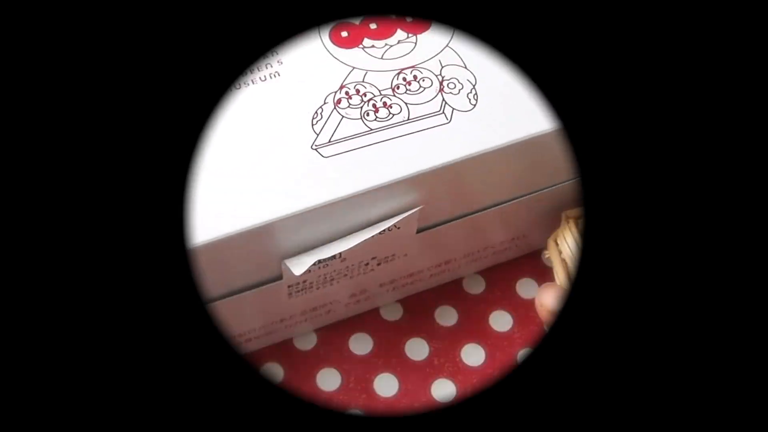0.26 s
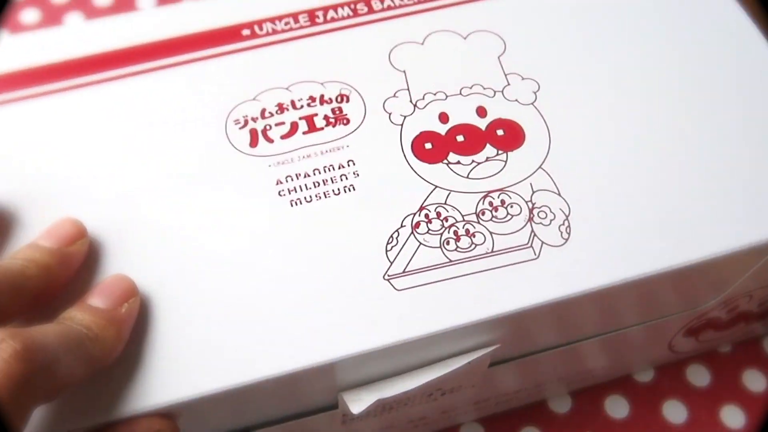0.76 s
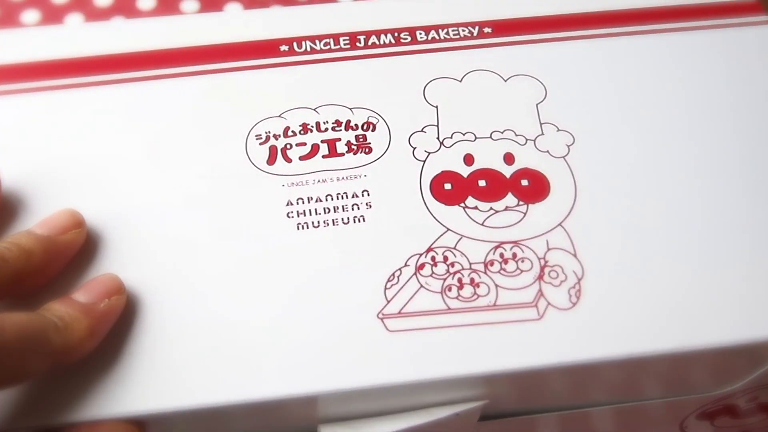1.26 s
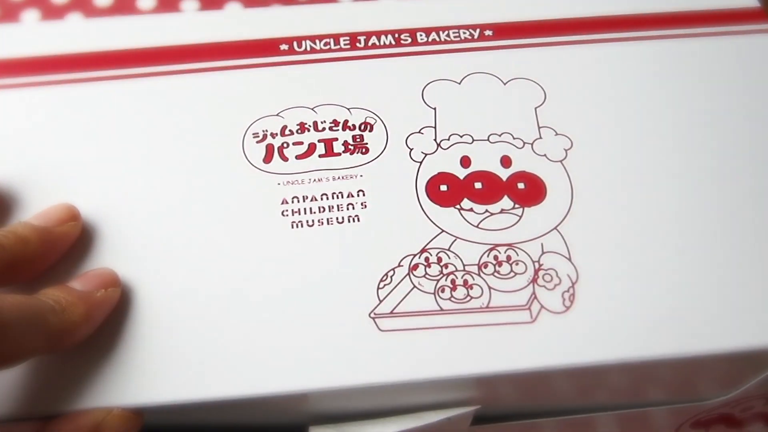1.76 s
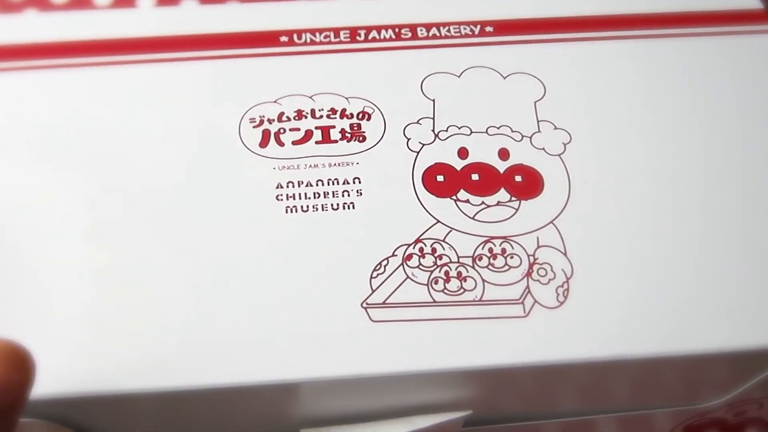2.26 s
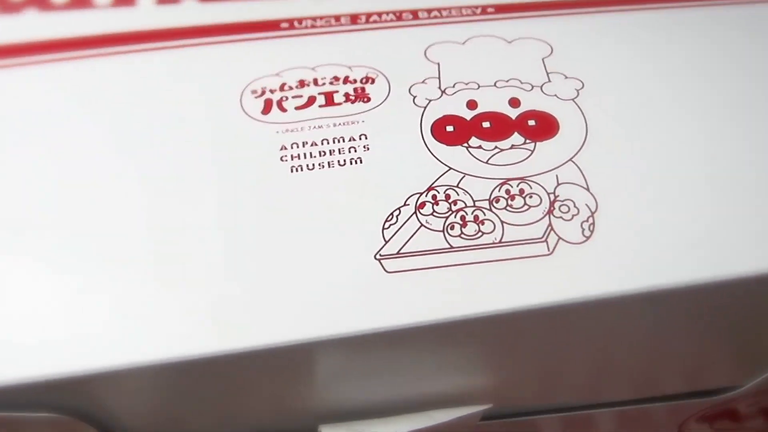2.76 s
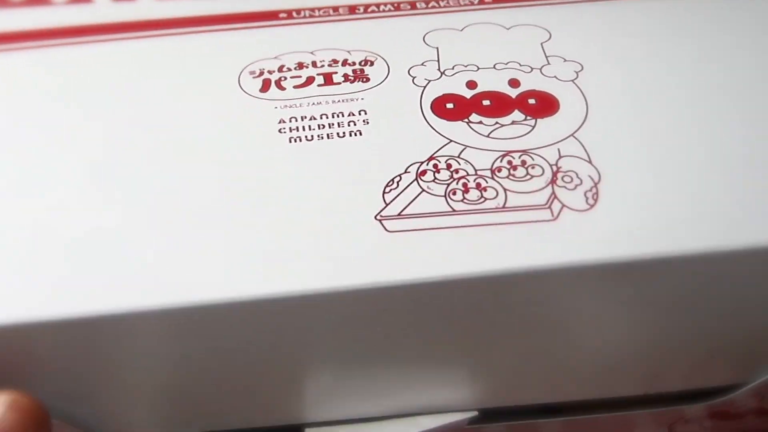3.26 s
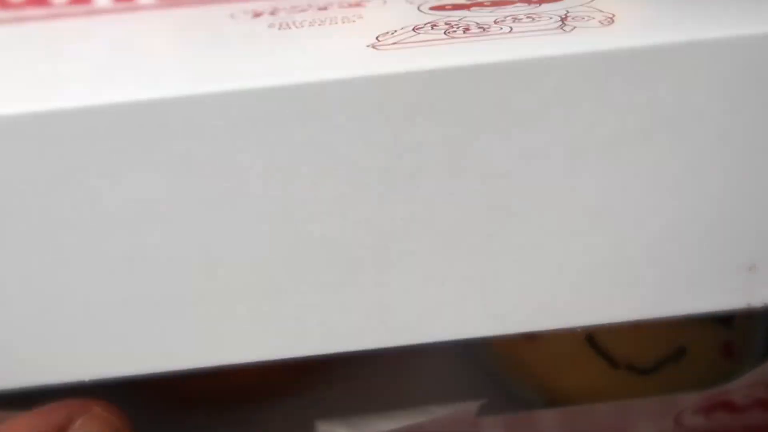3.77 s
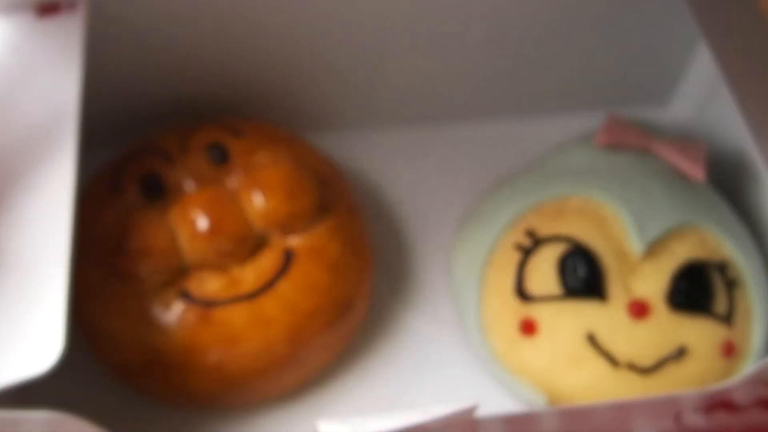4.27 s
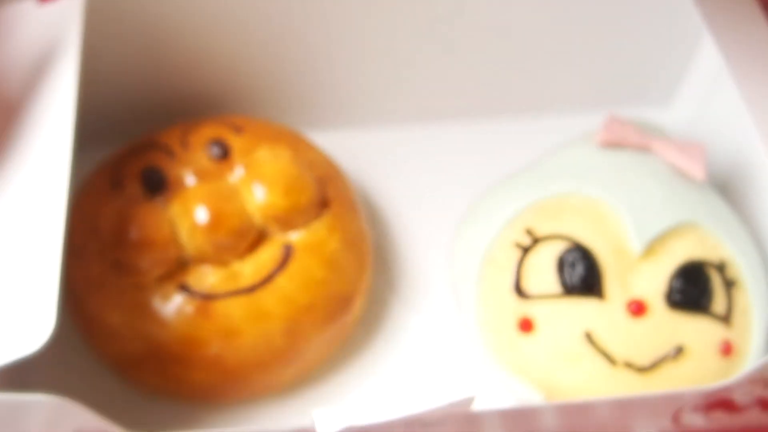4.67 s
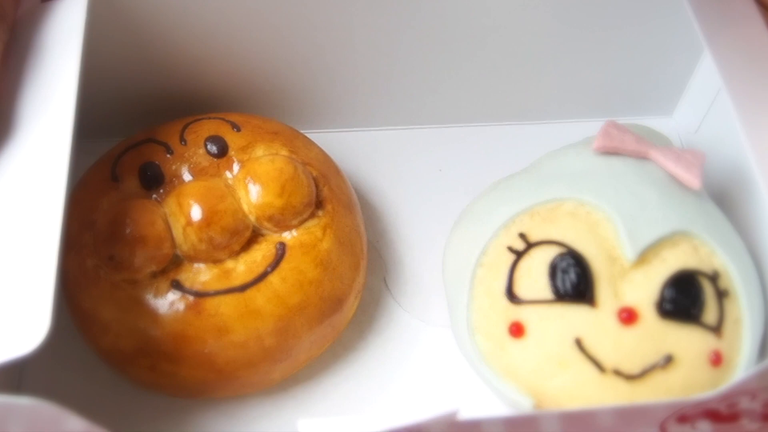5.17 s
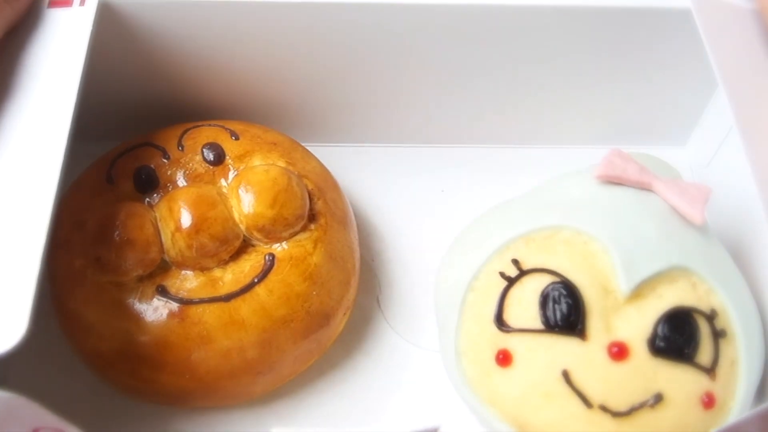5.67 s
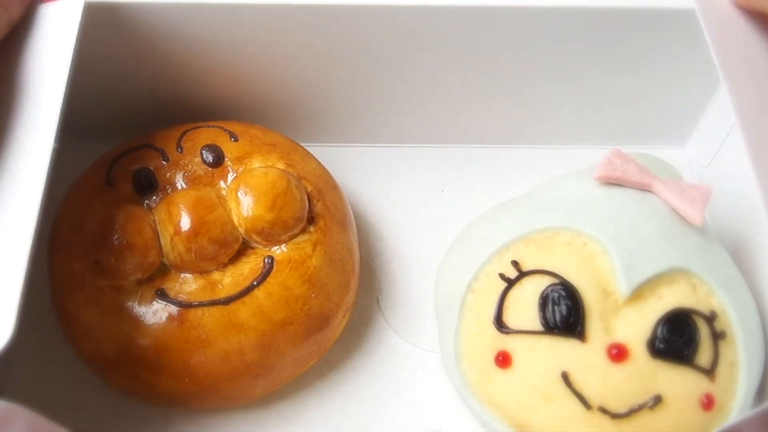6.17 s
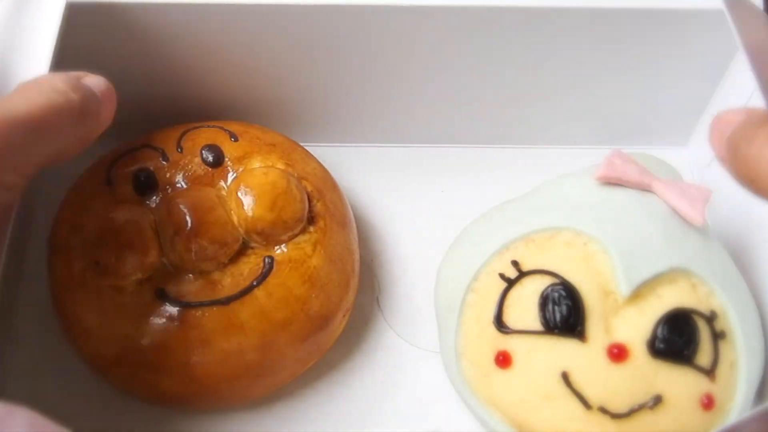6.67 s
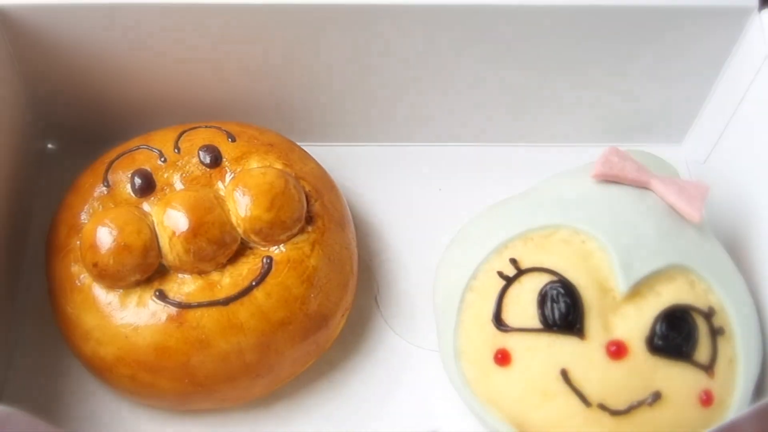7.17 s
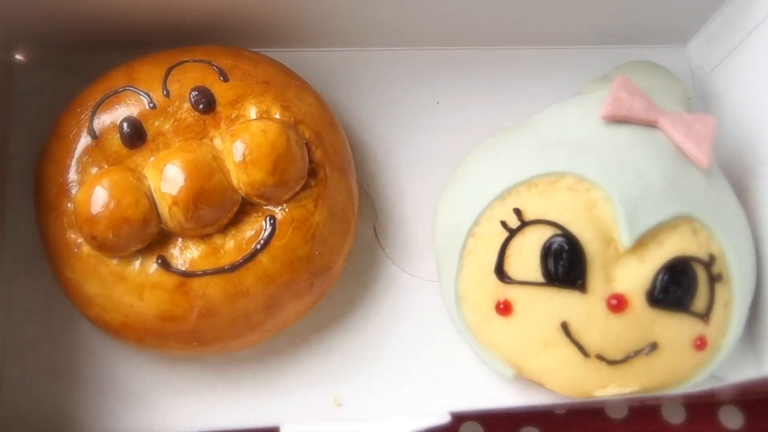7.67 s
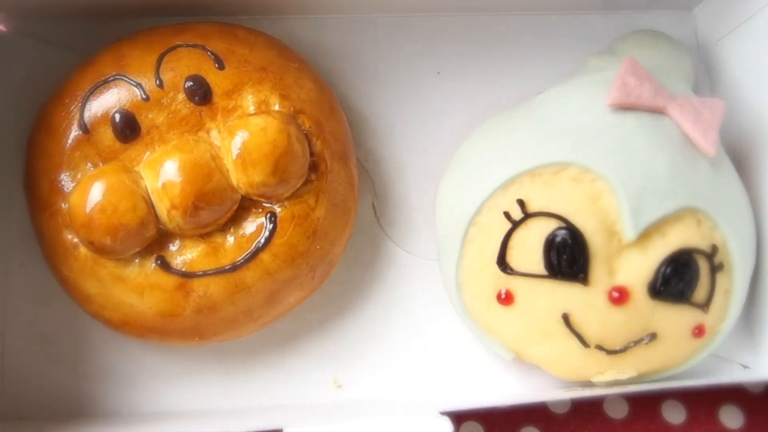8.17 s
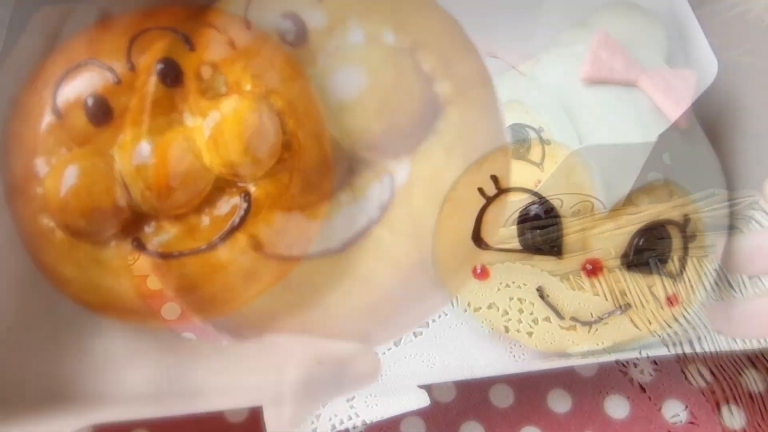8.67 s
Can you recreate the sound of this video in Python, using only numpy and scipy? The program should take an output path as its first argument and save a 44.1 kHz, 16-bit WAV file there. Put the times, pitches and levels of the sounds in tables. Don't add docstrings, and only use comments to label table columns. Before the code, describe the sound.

A paperboard box is handled close up, with finger rustles, sharp creasing snaps, hollow knocks and flap thumps, then quieter rubbing in a hushed room.

```python
import sys
import numpy as np
from scipy import signal
from scipy.fft import rfft, irfft, next_fast_len
from scipy.io import wavfile
from scipy.ndimage import uniform_filter1d, map_coordinates

SR = 44100
rng = np.random.default_rng(int(sys.argv[2]) if len(sys.argv) > 2 else 0)


def amplitude_ratio(level_db):
    exponent = np.asarray(level_db, float) / 20
    return 10 ** exponent


def pcm_store(signal):
    levels = np.round(np.clip(np.atleast_2d(signal), -1, 1) * 32767)
    wavfile.write(sys.argv[1], SR, levels.astype(np.int16).T)


N = 393813

# centre in Hz, width in Hz, level in dB.
BODY = [(112, 61, -18), (167.4, 64, -9.5), (291.6, 31, -2), (394.7, 101, 0), (476.5, 108, 1),
        (600.4, 61, -1), (686.6, 6.6, 0)]
# centre in Hz, width in Hz, level in dB.
LID = [(724, 127, -4.5), (884, 77, 2.5), (975, 86.5, 5.5), (1058, 230, -0.5), (1500, 440, -8.5),
       (1826, 450, -12)]


def unit(x):
    return x / np.sqrt(np.mean(x ** 2) + 1e-20)


def unit_peak(x):
    return x / np.abs(x[0]).max()


def lay(out, start_s, sound):
    start = round(start_s * SR)
    out[:, start:start + sound.shape[1]] += sound


def along(points, hz):
    f, v = np.transpose(points)
    return np.interp(np.log(hz + 1), np.log(f + 1), v)


def wobble(rate):
    knots = rng.standard_normal(int(N * rate / SR) + 4)
    return map_coordinates(knots, [np.arange(N) * rate / SR])


def filtered(x, response):
    m = next_fast_len(x.shape[-1] + 2048)
    return irfft(rfft(x, m) * response(np.fft.rfftfreq(m, 1 / SR)), m)[..., :x.shape[-1]]


def modes(table):
    def response(f):
        total = 0
        for k, (centre, width, db) in enumerate(table):
            resonance = 1j * f * width / (centre * centre - f * f + 1j * f * width)
            total = total + (-1) ** k * amplitude_ratio(db) * resonance
        return total
    return response


def vary(table):
    return [(c * rng.normal(1, 0.044), w, g + rng.normal(0, 1.66)) for c, w, g in table]


def patchy(x, depth_db):
    z = signal.stft(x, nperseg=256)[2]
    field = rng.standard_normal(z.shape[1:])
    field = uniform_filter1d(field, size=4, axis=0)
    field = uniform_filter1d(field, size=18, axis=1)
    gain = amplitude_ratio(depth_db * unit(field))
    return signal.istft(z * unit(gain), nperseg=256)[1][:, :N]


def fibres(rate, size_db, share):
    sizes = amplitude_ratio(size_db * np.minimum(rng.exponential(size=N), 3))
    catches = (rng.random(N) < rate / SR * amplitude_ratio(4 * wobble(25))) * sizes
    catches = signal.lfilter([1], [1, -.95], catches)
    strength = np.sqrt(1 - share) + np.sqrt(share) * unit(catches)
    return strength * rng.standard_normal((2, N))


def crease(centre_hz, spread, top_db):
    hump = modes([(centre_hz, spread * centre_hz, 0), (3200, 6000, -8)])

    def response(hz):
        steep = 1 / (1 + 1j * hz / 14000 - (hz / 9000) ** 2) ** 2 / (1 + (hz / 9800) ** 12)
        sparkle = amplitude_ratio(top_db) / (1 + (10500 / (hz + 1)) ** 12)
        return hump(hz) * steep + sparkle
    return response


def swells(rows, rest_db, other_rest_db):
    t, power = np.arange(N) / SR, amplitude_ratio([[2 * rest_db], [2 * other_rest_db]]) * np.ones(N)
    for s, length, db, over_db in rows:
        span = slice(round(s * SR), round((s + length) * SR))
        arch = np.sin(np.pi * (t[span] - s) / length) ** 2
        power[:, span] += arch * amplitude_ratio([[2 * db], [2 * (db + over_db)]])
    return np.sqrt(power)


def floor():
    # frequency in Hz, density in dB per Hz.
    floor_colour = [(15, -54), (25, -34), (76, -7), (231, -1.5), (280, -1.5), (763, -9), (948, -36),
                    (1120, -7.5), (1770, -14), (3040, -22.5), (7660, -18), (9510, -19), (10900, -30),
                    (14300, -19.5), (16400, -29)]
    noise = rng.standard_normal((2, N))
    return amplitude_ratio(-57.5) * unit(filtered(noise, lambda hz: amplitude_ratio(along(floor_colour, hz))))


def switch_on(t):
    return -amplitude_ratio(-45.5) * sum(np.exp(-((t - lag) / 0.00077) ** 2) for lag in (.003, .012))


def rubbing():
    # start in seconds, length in seconds, rasp in dB, hiss in dB over rasp.
    strokes = [(.12, 0.56, -51.5, 4), (.45, 0.58, -49.5, 3.5), (1.83, 0.4, -57, 6.5), (2.28, 0.2, -57, -1),
               (2.62, 0.57, -47.5, -1.5), (2.98, 0.54, -46, -3), (3.4, 0.41, -50, -2.5),
               (4.05, 0.75, -60, 6.5), (4.52, 0.43, -48, 0.5), (5.2, 0.31, -45.5, 0.5),
               (5.7, 0.59, -53.5, 1), (6.42, 0.61, -53.5, 3.5), (7.15, 0.5, -48, 0.5),
               (8.25, 0.37, -56, -12)]
    # start in seconds, length in seconds, body in dB, lid in dB over body.
    presses = [(.15, 0.65, -54.5, 5), (.48, 0.68, -51.5, -2), (1.0, 0.53, -54, -4),
               (1.35, 0.64, -49.5, -18), (1.8, 0.46, -46, -5), (2.3, 0.28, -42, 1), (2.45, 0.38, -50, 9.5),
               (2.68, 0.78, -45.5, 1.5), (3.03, 0.54, -54, 7), (3.3, 0.22, -47, -8),
               (4.05, 0.4, -53.5, 3.5), (4.5, 0.33, -50.5, -2), (5.1, 0.46, -42.5, 2), (5.5, 0.87, -57, 3),
               (6.35, 0.59, -63.5, 12.5), (7.2, 0.35, -68, 15)]
    # centre in Hz, width in Hz, level in dB.
    skin = [(1900, 1060, -4), (3290, 330, 9), (4580, 830, -7.5)]
    # frequency in Hz, density in dB per Hz.
    hiss_colour = [(2060, -11.5), (3500, 6.5), (3930, -0.5), (6220, -1), (7890, -3), (9100, -4),
                   (10800, -17.5), (13300, -12.5), (15900, -20), (16400, -30)]
    rasp_gain, hiss_gain = swells(strokes, rest_db=-57.5, other_rest_db=-58.5)
    body_gain, lid_gain = swells(presses, rest_db=-61.5, other_rest_db=-59.5)
    grip_db = 1.17 * wobble(30)
    surface = fibres(420, size_db=3, share=.1)
    panel = fibres(250, size_db=-2.5, share=0.34)
    rasp = rasp_gain * amplitude_ratio(grip_db) * unit(filtered(surface, modes(skin)))
    hiss = hiss_gain * amplitude_ratio(grip_db) * unit(filtered(surface, lambda hz: amplitude_ratio(along(hiss_colour, hz))))
    lid = lid_gain * amplitude_ratio(2.27 * grip_db) * unit(filtered(panel, modes(LID)))
    body = body_gain * amplitude_ratio(0.35 * grip_db) * unit(filtered(panel, modes(BODY)))
    return patchy(rasp + hiss + lid + body, depth_db=1.3)


def motor():
    # start in seconds, end in seconds, level in dB.
    runs = [
        (.2, 1.51, -64.5),
        (3.6, 4.51, -57.5),
        (4.6, 4.997, -66),
        (5.61, 6.497, -61),
        (7.972, 8.286, -58),
        (8.61, 8.936, -59.5),
    ]
    # frequency in Hz, level in dB.
    housing = [(284, 3.5), (436, 6)]
    t = np.arange(N) / SR
    step = t * 29.97 - .3
    weak_db = -3.5 * (np.floor(step) % 2 == 0)
    steps = 0.12 + amplitude_ratio(-22 * (step % 1) + weak_db + wobble(30))
    hum = sum(amplitude_ratio(db) * np.sin(2 * np.pi * hz * t + 0.47 * wobble(10)) for hz, db in housing)
    on = sum(amplitude_ratio(db) * (t > start) * (t < end) for start, end, db in runs)
    return uniform_filter1d(on, size=800) * unit(uniform_filter1d(steps, size=60) * hum)


def knocks():
    # time in seconds, body in dB, lid in dB over body, contact in ms.
    blows = [(1.02, -22.5, -2, 0.9), (1.271, -24.5, -10, 1), (1.434, -21, -28, 1.2), (1.651, -18, 1, 0.97),
             (1.781, -26, 7, 1.4), (1.862, -12, -6.5, 0.56), (1.926, -15, -22, 1),
             (1.966, -17.5, -9.5, 1.5), (2.108, -24.5, -0.5, 1.8), (2.257, -23, -9, 0.39),
             (2.396, -25, -6, 0.64), (2.78, -23, -3, .8), (2.883, -23, -25, 2), (2.997, -15, -1.5, 0.43),
             (3.114, -15, -12, 1.2), (3.317, -22, -6, 0.85), (3.451, -19.5, -5.5, 1.2),
             (3.519, -3, -3, 1.34), (3.995, -26, 3.5, 0.96), (4.578, -18.5, -10.5, 2.2),
             (5.152, -8, -1, .6), (5.319, -21, -0.5, 2.9), (5.405, -17.5, 1, 1.1), (5.961, -20.5, 1, 3.6),
             (6.937, -25.5, -2.5, 1.64), (7.89, -30, -3.5, 1.23)]
    # time in seconds, body in dB.
    taps = [(0.208, -33.5), (0.334, -28), (0.58, -24.5), (1.521, -17), (1.794, -38), (2.044, -32),
            (2.347, -28), (2.493, -23), (3.554, -16), (5.37, -21.5), (5.565, -31.5), (5.631, -35),
            (5.994, -31), (6.178, -34), (6.282, -37.5), (6.549, -33), (7.047, -33), (8.565, -40),
            (5.781, -35.5), (7.25, -36.5), (8.28, -41), (7.1, -42), (3.779, -35.5), (2.971, -27),
            (2.73, -30), (3.2, -32), (5.346, -36), (1.602, -26.5)]
    # centre in Hz, width in Hz, level in dB.
    table_modes = [(70, 58, 2), (131, 32, 13), (200, 150, 8.5)]
    out, t = np.zeros((2, N + 8192)), np.arange(4096) / SR
    tap_lid_db, tap_ms = 0, 1.07
    for s, db, lid_db, contact_ms in blows + [(s, db, tap_lid_db, tap_ms) for s, db in taps]:
        u = np.minimum(1000 * t / contact_ms, 1)
        blow = np.sin(np.pi * u) ** 2 * [[1], [0]]
        rattle = rng.standard_normal((2, len(t))) * amplitude_ratio(-60 * t / 0.04)
        body = unit_peak(filtered(blow + 0.77 * rattle, modes(vary(BODY))))
        lid = unit_peak(filtered(blow + 1.6 * rattle, modes(vary(LID))))
        thud = unit_peak(filtered(blow + 0.39 * rattle, modes(vary(table_modes))))
        mix = body + amplitude_ratio(lid_db + 8) * lid + amplitude_ratio(-30.0) * contact_ms ** 2 * thud
        lay(out, s + .001, amplitude_ratio(db + 2.5) * mix / 4.68)
    return out[:, :N]


def snaps():
    # time in seconds, peak in dB, centre in Hz, top sparkle in dB.
    creases = [(0.401, -15.5, 6860, -15), (0.589, -17, 6800, -26), (1, -29, 6100, -25),
               (1.0515, -18.5, 9300, -14), (1.5246, -15.5, 2330, -36), (1.6565, -20.5, 1650, -43),
               (1.7725, -23, 1630, -35), (1.798, -13, 5000, -16), (1.8643, -2, 6600, -12.5),
               (1.99, -23.5, 1590, -27), (2.4975, -17, 3080, -47), (2.726, -25.5, 2000, -38),
               (2.7828, -21, 3760, -31), (2.895, -21.5, 3880, -27), (2.9984, -9.5, 3000, -32),
               (3.117, -17, 2740, -37), (3.1749, -9, 4330, -24), (3.5204, -2, 2570, -44),
               (3.556, -11.5, 2660, -46), (3.9958, -18, 2020, -47), (5.077, -21, 2860, -33),
               (5.1484, -9.5, 2030, -54), (5.323, -15.5, 3400, -24), (5.9636, -16, 3870, -33),
               (6.283, -23, 3000, -28), (6.9398, -24, 3280, -40), (7.011, -23, 4800, -23),
               (7.182, -25.5, 1500, -40), (1.804, -6, 5200, -24), (1.811, -14, 5000, -22),
               (1.824, -19, 6500, -20), (1.8445, -23, 7000, -20), (1.921, -23, 7000, -22),
               (2.4355, -34, 1500, -40), (2.9827, -31, 1560, -40), (3.1059, -33, 4230, -30),
               (7.8905, -16.5, 3900, -12.5)]
    # time in seconds, peak in dB.
    ticks = [(0.21, -34), (1.122, -31), (1.3664, -26.5), (1.606, -31), (2.113, -30), (2.2594, -37),
             (2.466, -24), (8.51, -35), (3.323, -28), (8.463, -36), (3.455, -31), (3.784, -35),
             (4.124, -30), (4.283, -29.5), (4.5233, -35), (5.4083, -31), (5.5424, -32), (5.567, -31),
             (5.5808, -28), (6.551, -28.5), (6.655, -29), (7.1478, -32), (7.2376, -31), (7.584, -29),
             (7.6872, -29), (7.9706, -28), (8.08, -33.5), (8.665, -24.5), (8.75, -26), (8.833, -47),
             (2.3247, -35), (2.6454, -38), (2.9368, -37), (3.4142, -31), (3.4676, -33), (3.491, -32),
             (3.685, -34), (3.721, -40), (5.488, -32), (5.609, -33)]
    # time in seconds, peak in dB.
    folds = [(1.02, -28), (1.249, -35), (1.2748, -31.5), (1.7595, -36), (2.393, -31), (2.973, -36),
             (3.6144, -25), (4.472, -26.5), (5.004, -32), (5.0297, -25), (5.273, -28), (6.8355, -32),
             (6.889, -31.5), (8.415, -39), (8.869, -52)]
    out, t = np.zeros((2, N + 4096)), np.arange(2048) / SR
    faint = [(s, db, 2880, -34) for s, db in ticks] + [(s, db, 1650, -37) for s, db in folds]
    for s, db, centre_hz, top_db in creases + faint:
        t60 = 0.027 * (3000 / centre_hz) ** 0.94
        decay = amplitude_ratio(-60 * t / t60) + 1.6 * amplitude_ratio(-60 * t / 0.0018)
        crackle = (1 - np.exp(-t / 0.00041)) * decay * rng.standard_normal((2, len(t)))
        crackle[:, 8] = [6.5, 3.5]
        burst = filtered(crackle, crease(centre_hz, spread=0.96, top_db=top_db + 12.5))
        lay(out, s, amplitude_ratio(db) * unit_peak(burst))
    return out[:, :N]


def room(x):
    # frequency in Hz, 60 dB decay in seconds.
    decay_times = [(200, 0.36), (1000, 0.43), (4000, 0.25), (12000, 0.2)]
    hz, t, z = signal.stft(rng.standard_normal((2, SR // 3)), SR, nperseg=256)
    decay = amplitude_ratio(-60 * t / along(decay_times, hz)[:, None])
    tail = signal.istft(z * decay, SR, nperseg=256)[1]
    delayed = np.pad(x[0], (250, 0))[None]
    return signal.fftconvolve(delayed, tail / np.linalg.norm(tail[0]), axes=1)[:, :N]


def creaks():
    # time in seconds, peak in dB, pitch in Hz.
    wall_slips = [(0.49, -37.5, 400), (0.72, -34.5, 350), (1.829, -20.5, 509), (2.335, -37, 437),
                  (2.35, -34, 500), (2.414, -35.5, 500), (2.434, -29, 692), (2.454, -26, 480),
                  (2.469, -27, 684), (2.639, -42, 705), (2.661, -32.5, 517), (2.794, -32.5, 455),
                  (2.81, -31, 316), (2.829, -40, 468), (2.97, -33.5, 328), (3.387, -33.5, 724),
                  (4.019, -36, 300), (4.469, -37, 290), (8.277, -45, 503)]
    out, t = np.zeros((2, N + 4096)), np.arange(4096) / SR
    for s, db, pitch_hz in wall_slips:
        slips = rng.standard_normal((2, len(t))) * amplitude_ratio(-60 * t / 0.045)
        wall = modes([(pitch_hz, 0.13 * pitch_hz, 0), (1.9 * pitch_hz, 400, -12)])
        lay(out, s, amplitude_ratio(db + 2) * unit_peak(filtered(slips, wall)))
    return out[:, :N]


def scrapes():
    # start in seconds, length in seconds, level in dB, centre in Hz.
    jams = [
        (1.112, 0.045, -50.5, 3000),
        (1.427, 0.036, -45.5, 2470),
        (1.755, 0.016, -43.5, 2500),
        (1.772, 0.014, -37, 2000),
        (2.713, 0.052, -41, 2950),
        (2.973, 0.067, -40, 3600),
        (3.525, 0.13, -45.5, 2870),
        (5.402, 0.077, -50.5, 3540),
    ]
    # start in seconds, length in seconds, level in dB, centre in Hz.
    drags = [(.574, 0.065, -41, 6550), (1.785, 0.047, -21.5, 4750), (1.81, 0.061, -28, 4000),
             (1.858, 0.024, -16.5, 5360), (1.957, 0.078, -45.5, 2940), (2.242, 0.087, -43, 4600),
             (2.318, 0.079, -46, 4430), (2.388, 0.31, -43, 2800), (2.64, 0.073, -44, 2800),
             (3.457, .07, -40, 3150), (2.6, .05, -50, 3000), (2.68, .04, -45, 3000),
             (3.101, 0.12, -35, 2800), (5.311, .12, -37.5, 4130), (5.565, 0.11, -43, 3470),
             (6.17, 0.12, -50.5, 4670), (6.811, .098, -48, 1900)]
    # start in seconds, length in seconds, level in dB, centre in Hz.
    brushes = [(2.483, 0.18, -37, 2770), (3.167, 0.048, -29, 4370), (4.566, 0.06, -39, 4000),
               (5.034, 0.1, -42, 3330), (6.24, 0.097, -47.5, 4450), (7.013, 0.05, -46, 4700),
               (7.88, 0.082, -47.5, 6100), (7.263, 0.041, -46, 5500), (7.42, 0.12, -54, 3500),
               (7.185, .02, -50, 5200), (8.3, .15, -58, 2800), (8.405, .025, -53, 1900),
               (3.18, .03, -36, 3200), (1.79, .03, -27, 5300)]
    # centre in Hz, width in Hz, level in dB.
    card_modes = [(1560, 150, -1), (2020, 54, -1), (2800, 660, 3.5), (3365, 100, 11), (4000, 840, -29),
                  (4800, 180, -1), (5230, 350, -32)]
    grit, out = fibres(500, size_db=3.0, share=0.3), np.zeros((2, N))
    kinds = [(jams, 6.5), (drags, -2.25), (brushes, -8.5)]
    for rows, box_db in kinds:
        for s, length, db, centre_hz in rows:
            u = np.arange(8192) / (SR * np.clip(length, .01, .15))
            swell = np.sin(np.pi * np.minimum(u, 1) ** 0.59) ** 1.4
            drag = swell * grit[:, round(s * SR):][:, :len(u)]
            edge = unit(filtered(drag, crease(centre_hz, spread=0.73, top_db=-29.5)))
            card = 0.5 * unit(filtered(drag, modes(vary(card_modes))))
            box = unit(filtered(drag, modes(vary(LID)))) + 0.53 * unit(filtered(drag, modes(vary(BODY))))
            swell_rms = np.sqrt(np.mean(swell ** 2))
            lay(out, s, swell_rms * amplitude_ratio(db) * (edge + card + amplitude_ratio(box_db) * box))
    return patchy(out, depth_db=2.5)


def thumps():
    # time in seconds, level in dB, contact in ms, pitch over usual, lid in dB.
    falls = [(5.018, -11.5, 1.2, 1.02, -11), (5.147, -5, 1.1, .97, -8), (5.2445, -16, 1.6, 0.9, -20),
             (5.258, -23, 2.5, .7, -20), (5.03, -20, 1.3, .95, -14), (7.181, -27, 1.3, 0.76, -4),
             (5.962, -36, 3, .7, -20), (7.322, -26.5, 1.55, 0.83, 0), (1.8691, -8, 1.3, 1.12, -24),
             (3.524, -20, 1.3, .72, 2), (5.361, -34, 3.5, .6, -20), (5.8, -45, 3.5, .65, -20)]
    # centre in Hz, width in Hz, level in dB.
    air = [(160, 50, -8), (300, 65, 0), (395, 75, -2), (580, 70, -2), (756, 160, -8)]
    out, t = np.zeros((2, N + 8192)), np.arange(8192) / SR

    def push(lag_s, contact_ms):
        return np.sin(np.pi * np.clip(1000 * (t - lag_s) / contact_ms, 0, 1)) ** 2

    for s, db, contact_ms, pitch, lid_db in falls:
        pushes = push(0, contact_ms) + amplitude_ratio(-12.5) * push(.02, contact_ms)
        flutter = uniform_filter1d(rng.standard_normal((2, len(t))), size=30)
        flutter = flutter * amplitude_ratio(-60 * t / 0.068) * np.minimum(t / 0.0029, 1)
        drive = pushes * [[1], [0]] + 1.2 * flutter
        cavity = [(c * pitch, w, g) for c, w, g in air]
        lid = [(c, w, g + lid_db) for c, w, g in LID]
        lay(out, s, amplitude_ratio(db) * unit_peak(filtered(drive, modes(cavity + lid))))
    return out[:, :N]


def squeaks():
    # start in seconds, length in seconds, level in dB, pitch in Hz.
    thumb_slips = [
        (2.49, 0.05, -34, 930),
        (2.52, .04, -36, 903),
        (2.554, 0.058, -35.5, 937),
        (4.114, 0.044, -44, 895),
        (6.158, .05, -41, 860),
        (6.271, 0.036, -38, 865),
        (6.616, 0.053, -45, 847),
    ]
    out, drift, flutter = np.zeros((2, N)), 1.5 * wobble(60), amplitude_ratio(4.5 * wobble(110))
    for s, length, db, pitch_hz in thumb_slips:
        k = np.arange(round(s * SR), round((s + length) * SR))
        arch = np.sin(np.pi * (k - k[0]) / len(k))
        tone = np.sin(2 * np.pi * pitch_hz * k / SR + drift[k])
        out[0, k] += amplitude_ratio(db) * arch * flutter[k] * tone
    return out


def stereo(pair):
    # frequency in Hz, correlation from 0 to 1.
    alike = [(40, .9), (90, .97), (350, .97), (700, .94), (1400, .8), (2800, .53), (5600, .33), (10000, .2),
             (14000, .03)]

    def blend(hz):
        turn = np.arccos(np.clip(along(alike, hz), 0, 1)) / 2
        return np.array([np.cos(turn), np.sin(turn)])

    mid, side = filtered(pair, blend)
    return np.array([mid + side, mid - side])


def scene():
    steady = floor() + rubbing()
    purr = motor()
    hits = knocks() + snaps() + creaks() + scrapes() + thumps() + squeaks()
    return stereo(hits + amplitude_ratio(-13) * room(hits) + steady) + purr


def band(hz):
    # frequency in Hz, left over right in dB.
    tilt = [(150, 0), (400, 1), (900, .8), (2400, -1.2), (6000, -1.5), (15000, -.5)]
    lean_db = along(tilt, hz) / 2 * [[1], [-1]]
    notch_db = -20 * (hz > 14800) * (hz < 15250)
    shelf_db = -50 * (hz > 15820)
    return amplitude_ratio(lean_db + notch_db + shelf_db) * (hz < 16400)


def band_limit(x):
    return signal.sosfilt(signal.butter(12, 16520, fs=SR, output="sos"), x)


def record(dry):
    t = np.clip(np.arange(N) / SR - .021, 0, None)
    x = dry * np.minimum(t / 0.13, 1) + switch_on(t)
    x = x / (1 + np.abs(x / .6) ** 4) ** .25
    return band_limit(filtered(x, band))


dry = scene()
out = record(dry)
pcm_store(out)
```